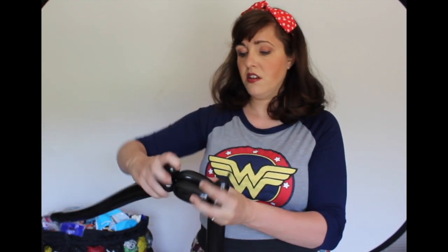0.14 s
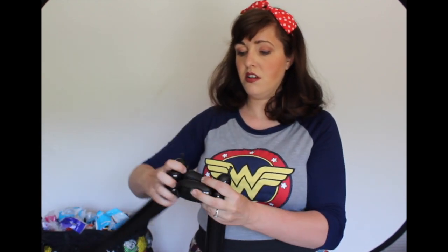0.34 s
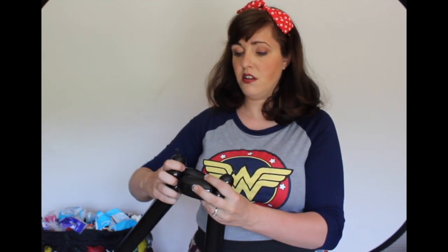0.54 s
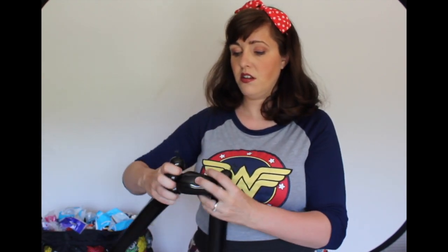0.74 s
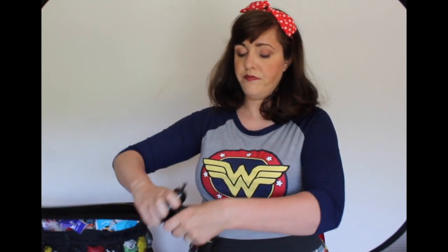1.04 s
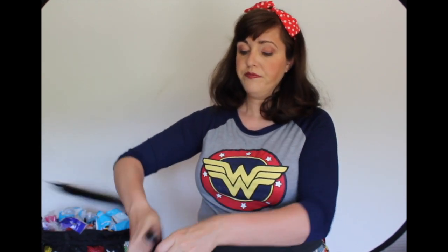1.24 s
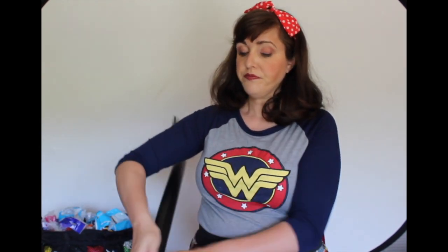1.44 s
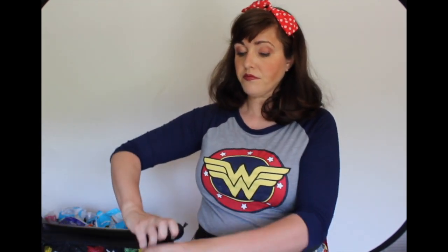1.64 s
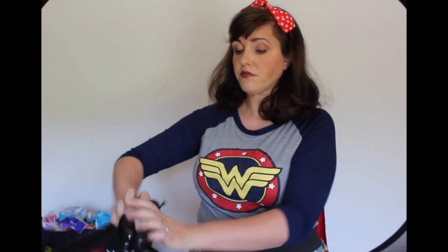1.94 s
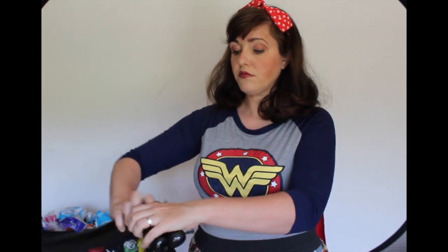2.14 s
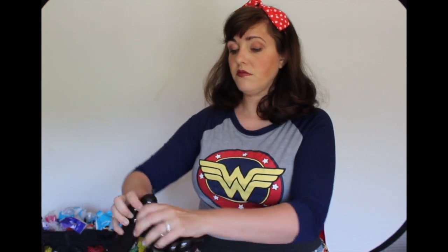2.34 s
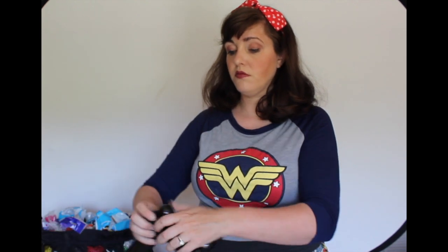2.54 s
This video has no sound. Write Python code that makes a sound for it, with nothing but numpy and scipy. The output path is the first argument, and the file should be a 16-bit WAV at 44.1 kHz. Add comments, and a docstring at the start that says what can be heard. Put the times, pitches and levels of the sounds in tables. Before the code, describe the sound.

A long inflated latex balloon is twisted by hand. Bright stuttering squeaks burst at 0.2 s, with hollow thuds and snaps at 0.35-0.85. After a brief lull, rubbing and creaks resume at 1.04-1.3, with a sharp snap and squeak at 1.4. Quieter slips lead to a low, hollow bump around 1.96; tight squeaky snaps cluster at 2.3-2.45, then fade by 2.7. Bare room ring, faint hiss.

```python
"""A long inflated latex balloon is twisted by hand in a bare room, a couple of metres from the microphone.
Taut skin sticks and slips in short runs of snaps: damped sines, noise cracks and a noisy scrape.
Hands and tube bump with hollow thuds and low pushes, made of slower damped sines with a soft onset or none.
A grainy rub of dense tiny pings over hiss runs between; noise tails let the walls ring on,
and a faint steady noise lies beneath."""
import sys
import numpy as np
from scipy import signal
from scipy.fft import rfft, irfft, next_fast_len
from scipy.io import wavfile

SR = 44100
rng = np.random.default_rng(int(sys.argv[2]) if len(sys.argv) > 2 else 0)


def ratio_of_db(decibels):
    """Turn decibels (scalar or array-like) into linear amplitude factors; 0 dB maps to 1."""
    return 10 ** (np.asarray(decibels, float) / 20)


def waveform_to_disk(signal):
    """Save audio, clipped to [-1, 1], as 16-bit WAV at the path in sys.argv[1]."""
    frames = np.transpose(np.atleast_2d(signal))
    scaled = np.clip(frames, -1, 1) * 32767
    samples = np.round(scaled).astype(np.int16)
    wavfile.write(sys.argv[1], SR, samples)


N = 119070  # samples, 2.7 s


def unit(x):
    """Scale to rms 1."""
    return x / np.sqrt(np.mean(x ** 2) + 1e-20)


def along(points, hz):
    """Read a curve of (Hz, value) points on a log frequency axis."""
    f, value = np.transpose(points)
    return np.interp(np.log(hz + 1), np.log(f + 1), value)


def filtered(x, response_db):
    """Shape the spectrum of x by a gain in dB that is a function of frequency."""
    size = next_fast_len(N + 8192)
    gain = ratio_of_db(response_db(np.fft.rfftfreq(size, 1 / SR)))
    return irfft(rfft(x, size) * gain, size)[..., :N]


def laid(s, shapes):
    """Sum short shapes (rows) at their start times in seconds."""
    at = np.round(s * SR).astype(int)[:, None] + np.arange(shapes.shape[1])
    return np.bincount(np.clip(at, 0, N).ravel(), shapes.ravel(), N + 1)[:N]


def pings(s, gain, hz, cycles, size, rise=0):
    """Damped sines that lose 20 dB in so many cycles; a soft contact rises over some cycles."""
    phase = hz[:, None] * np.arange(size) / SR  # in cycles
    sign = rng.choice([-1, 1], len(s))
    onset = 1 - np.exp(-phase / rise) if rise else 1
    ring = np.sin(2 * np.pi * phase) * ratio_of_db(-20 * phase / cycles) * onset
    return laid(s, (gain * sign)[:, None] * ring)


def runs(table, gap_s, pitch_scatter, count):
    """Each event is a run of slips at uneven gaps that dies away: time, gain, pitch per slip."""
    gap_scatter, size_scatter_db = 0.15, 3.5
    s, db, hz, t60, *_ = np.transpose(table)[:, :, None]
    # the first slip of a run is not scattered
    z = rng.standard_normal((len(table), 3, count)) * (np.arange(count) > 0)
    gaps = gap_s * np.exp(gap_scatter * z[:, 0])
    after = np.cumsum(gaps, axis=1) - gap_s
    fade_db = -60 * after / np.maximum(t60, 1 / 200)
    gain = ratio_of_db(db + fade_db + size_scatter_db * z[:, 1])
    shift = np.exp(pitch_scatter * z[:, 2])
    return (s + after).ravel(), (gain * np.sqrt(shift)).ravel(), (hz * shift).ravel()


# Colour of the background noise. Each row: frequency in Hz, relative density in dB per Hz.
AIR_COLOUR = [(15, -10), (40, -19), (120, -5), (300, -9), (800, -13), (3200, -40), (10000, -10.5),
              (14300, -38), (16000, -60)]


def background_air():
    """Steady background noise, rumbly to bright by its colour curve."""
    level_db = -52.5
    noise = rng.standard_normal(N)
    return ratio_of_db(level_db) * unit(filtered(noise, lambda f: along(AIR_COLOUR, f)))


# How long the bare walls ring. Each row: frequency in Hz, time to die by 60 dB in seconds.
WALL_DECAY = [(100, 0.43), (500, 0.57), (2000, 0.24), (6000, 0.29), (14000, 0.12)]


def room(x):
    """Scatter from hands, chest and table, then bare walls where each frequency dies at its own speed."""
    wall_db, wall_delay_s = -9, 0.008
    near_db, near_t60_s = -3.5, 0.12
    wait = round(wall_delay_s * SR)
    out = np.zeros(N + 2 * SR)
    part = SR // 20  # both answers are drawn anew for each 50 ms of sound, so no fixed colour builds up
    near_t = np.arange(SR // 8) / SR
    for a in range(0, N, part):
        hz, t, z = signal.stft(rng.standard_normal(SR * 3 // 4), SR, nperseg=256)
        decay = ratio_of_db(-60 * t / along(WALL_DECAY, hz)[:, None])
        walls = signal.istft(z * decay, SR, nperseg=256)[1]
        near = ratio_of_db(-60 * near_t / near_t60_s) * rng.standard_normal(len(near_t))
        answer = np.pad(ratio_of_db(wall_db) * walls / np.linalg.norm(walls), (wait, 0))
        answer[:len(near)] += ratio_of_db(near_db) * near / np.linalg.norm(near)
        y = signal.fftconvolve(x[a:a + part], answer)
        out[a:][:len(y)] += y
    return out[:N]


# Colour of latex noise. Each row: frequency in Hz, relative density in dB per Hz.
SKIN_COLOUR = [(410, -46), (700, -16), (1060, 9), (2770, 8), (7590, -6), (11500, -14.5), (14600, -58),
               (16000, -94)]


def skin_noise(noise, depth=1):
    """Give noise the colour of the latex; depth scales the curve's dB."""
    return filtered(noise, lambda f: depth * along(SKIN_COLOUR, f))


# How hard the fingers rub. Each row: time in seconds, level in dB before the rub's trim; straight between.
RUB_LEVEL = [(0, -22), (.06, -24), (.09, -20), (0.161, -18.5), (.21, -14.5), (.28, -29.5), (.32, -25),
             (.44, -30.5), (.54, -24.5), (.62, -35.5), (.72, -26.5), (.80, -29.5), (.84, -29), (.9, -33.5),
             (1.029, -35.5), (1.037, -21), (1.13, -25.5), (1.256, -28), (1.274, -22), (1.34, -22),
             (1.40, -15.5), (1.44, -20), (1.50, -26.5), (1.62, -33.5), (1.68, -27), (1.801, -37.5),
             (1.852, -17), (1.94, -34), (1.96, -26), (2.06, -29.5), (2.17, -40), (2.30, -27), (2.41, -27),
             (2.51, -26.5), (2.63, -37), (2.67, -26.5), (2.7, -33)]


def rub():
    """Fingers drag on latex: dense tiny slips over a thin hiss."""
    slips_per_s, middle_hz, pitch_spread, cycles = 3000, 2414, 0.63, 1.74
    size_db, trim_db, hiss_db = 4, -6, -6.5
    count = 9000
    s = np.cumsum(rng.exponential(1, count)) / slips_per_s
    hz = np.clip(middle_hz * np.exp(pitch_spread * rng.standard_normal(count)), 300, 8000)
    gain = ratio_of_db(size_db * np.minimum(rng.exponential(1, count), 3)) * np.sqrt(hz)
    grains = unit(pings(s, gain, hz, cycles, size=250))
    hiss = unit(skin_noise(rng.standard_normal(N)))
    at, level_db = np.transpose(RUB_LEVEL)
    level = ratio_of_db(trim_db + np.interp(np.arange(N) / SR, at, level_db))
    return level * (grains + ratio_of_db(hiss_db) * hiss)


# Low pushes of a palm on the tube. Each row: start in seconds, level in dB before damping, pitch in Hz.
PALM_PUSHES = [(.003, -18.5, 103), (0.348, -22, 99), (0.501, -8.5, 97), (1.421, -26, 112),
               (1.966, -3.5, 134), (2.169, -20, 79), (2.229, -18, 76), (2.521, -26, 116)]


def pushes():
    """Palms push the tube low: each push is one heavily damped sine."""
    s, db, hz = np.transpose(PALM_PUSHES)
    return pings(s, ratio_of_db(db), hz, cycles=2.3, size=5000)


# Bumps on the air-filled tube. Each row: start in seconds, first bump's level in dB before trim and damping,
# its hollow pitch in Hz, time for the run to die by 60 dB in seconds.
TUBE_BUMPS = [(.004, -19.5, 273, 0.092), (.174, -16.5, 666, 0.56), (.245, -16.5, 610, 0.23),
              (.334, -17.5, 295, 0.12), (.352, -8.5, 497, 0.12), (.499, -14.5, 351, 0.12),
              (.56, -18, 750, 0.18), (.628, -7.5, 592, 0.2), (.634, -3.5, 673, 0.2), (.805, -6, 663, 0.11),
              (.82, -11.5, 690, 0.091), (1.04, -19, 735, 0.28), (1.385, -10, 840, 0.11),
              (1.529, -11.5, 640, 0.049), (1.63, -21.5, 409, 0.32), (1.847, -24, 605, 0.2),
              (1.957, -8.5, 970, 0.13), (1.96, -11, 286, 0.087), (1.968, -8, 570, 0.056),
              (1.984, -10.5, 350, 0.076), (2.022, -17.5, 480, 0.1), (2.239, -25.5, 362, 0.16),
              (2.33, -20.5, 474, 0.063), (2.493, -17, 403, 0.13), (2.549, -20.5, 450, 0.032)]


def thuds():
    """Soft bumps, in dying runs, ring the air inside the tube."""
    trim_db = 2
    s, gain, hz = runs(TUBE_BUMPS, gap_s=0.0041, pitch_scatter=0.16, count=24)
    return ratio_of_db(trim_db) * pings(s, gain, hz, cycles=3.3, size=1500, rise=0.45)


def cracks(s, gain):
    """Very short noise bursts: the treble of skin letting go, with half the latex colour in dB."""
    t60_s = 0.0028
    t = np.arange(160) / SR
    bursts = ratio_of_db(-60 * t / t60_s) * rng.standard_normal((len(s), len(t)))
    return skin_noise(laid(s, gain[:, None] * bursts), depth=0.5)


# Single bright cracks. Each row: start in seconds, level in dB before the latex colour.
SINGLE_CRACKS = [(0.1433, -8), (0.3348, -19), (0.715, -4), (0.805, -4), (1.19, -20), (1.267, -21),
                 (1.3465, -8), (1.3921, -0.5), (1.53, -6.5), (1.78, -14)]


def ticks():
    """Single bright cracks of the skin, some on top of snap runs."""
    s, db = np.transpose(SINGLE_CRACKS)
    return cracks(s, ratio_of_db(db))


# Runs of stick-slip snaps. Each row: start in seconds, first snap's level in dB before trim and damping,
# its skin pitch in Hz, time for the run to die by 60 dB in seconds,
# treble over the snap in dB before the crack and scrape trims and the latex colour.
SNAP_RUNS = [(0.1751, -5, 2600, 0.013, -10), (0.183, 2.5, 2630, 0.043, -17.5),
             (0.2068, 2.5, 2800, 0.091, -23.5), (0.2583, -9, 1710, 0.06, -12.5),
             (0.3332, -14.5, 2840, 0.14, -10), (0.361, -9.5, 1730, 0.1, -15.5),
             (0.5295, -10, 2780, 0.045, -16), (0.632, -6, 1550, 0.18, -16),
             (0.7541, -11, 1350, 0.061, -16.5), (0.8064, -6.5, 2780, 0.088, -10.5),
             (0.8199, -2, 1580, 0.07, -23.5), (1.036, -23.5, 3000, 0.12, -20),
             (1.0914, -4.5, 1550, 0.082, -25), (1.1441, -11, 1580, 0.031, -12),
             (1.19, -11.5, 1500, 0.14, -21.5), (1.2687, -5, 1400, 0.17, -13.5),
             (1.4002, -5, 1230, 0.075, -15), (1.4203, 1, 3370, 0.061, -19), (1.5282, -7.5, 1480, 0.05, -17),
             (1.681, -13.5, 3280, 0.1, -15.5), (1.8122, -17, 3160, 0.033, -8),
             (1.8435, -11.5, 1480, 0.017, 3), (1.9553, -2.5, 1710, 0.054, -13),
             (2.0187, -17.5, 1630, 0.12, -8), (2.1819, -18, 1500, 0.037, -18.5),
             (2.2388, -17, 1750, 0.031, -14.5), (2.3238, -7, 2330, 0.05, -13.5),
             (2.3794, -4, 2530, 0.037, -12), (2.3879, 1, 1630, 0.057, -16.5),
             (2.4225, -5.5, 2020, 0.012, -21), (2.4267, -0.5, 2510, 0.042, -18.5),
             (2.535, -4, 2590, 0.044, -13.5), (2.6417, -18.5, 2400, 0.075, -13),
             (2.6608, -13, 1240, 0.076, -17)]


def snaps():
    """Every slip plucks the taut skin for a few cycles and cracks in the treble; the run scrapes as it dies."""
    snap_db, crack_db, scrape_db, scrape_rise_s = -3.5, 12, -2, 0.0045
    slips = 14  # per run
    s, gain, hz = runs(SNAP_RUNS, gap_s=0.0039, pitch_scatter=0.27, count=slips)
    plucks = ratio_of_db(snap_db) * pings(s, gain, hz, cycles=3.53, size=300)

    start, db, _, t60, treble_db = np.transpose(SNAP_RUNS)[:, :, None]
    treble = ratio_of_db(np.repeat(treble_db, slips))
    bright = cracks(s, gain * treble * ratio_of_db(crack_db))

    t = np.arange(SR // 8) / SR
    # the scrape dies half as fast as the run
    swell = ratio_of_db(db + treble_db - 30 * t / t60) * (1 - np.exp(-t / scrape_rise_s))
    scrape = skin_noise(laid(start[:, 0], swell * rng.standard_normal(swell.shape)))
    return plucks + bright + ratio_of_db(scrape_db) * scrape


def scene():
    """The balloon in its room."""
    balloon = rub() + pushes() + thuds() + ticks() + snaps()
    return (balloon + room(balloon))[None]


# Colour of the microphone. Each row: frequency in Hz, gain in dB.
MIC_COLOUR = [(25, -40), (80, -21.5), (170, -10.5), (260, -1), (3000, 3), (9000, 4.5), (14500, 1.5),
              (16000, -31)]


def microphone(x):
    """Colour the sound, then bend peaks softly towards a ceiling."""
    ceiling = 0.94
    x = filtered(x, lambda f: along(MIC_COLOUR, f))
    return x / (1 + np.abs(x / ceiling) ** 8) ** (1 / 8)


def top_cut(x):
    """Nothing passes above the cut-off."""
    return signal.sosfilt(signal.butter(12, 16440, fs=SR, output="sos"), x)


def record(dry):
    """The microphone's colour and soft clipping over steady background noise."""
    mix = microphone(dry) + background_air()
    return top_cut(mix)


dry = scene()
out = record(dry)
waveform_to_disk(out)
```